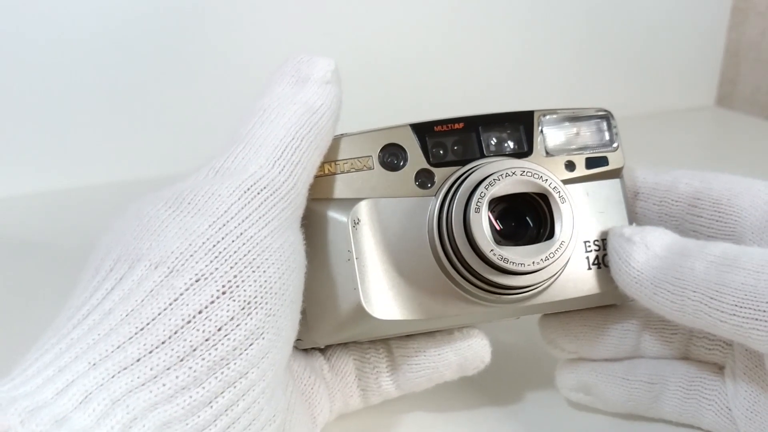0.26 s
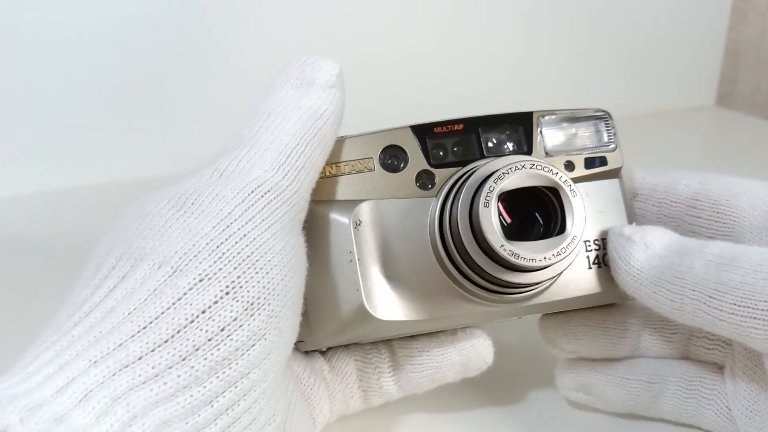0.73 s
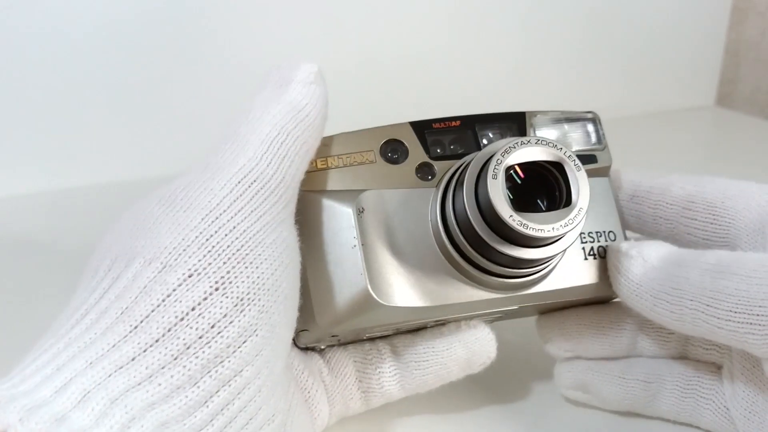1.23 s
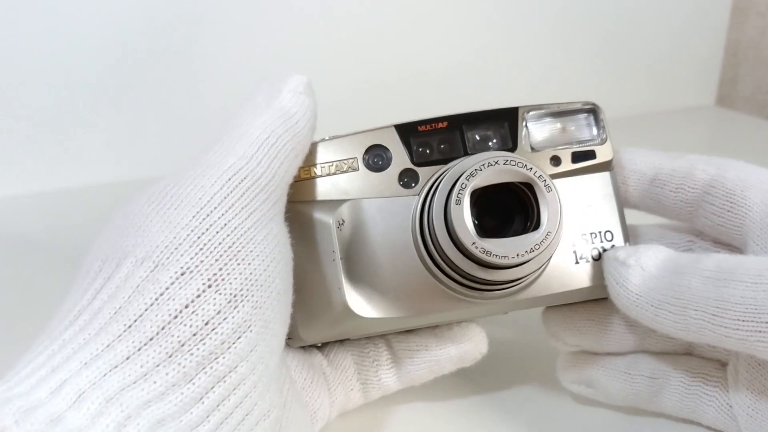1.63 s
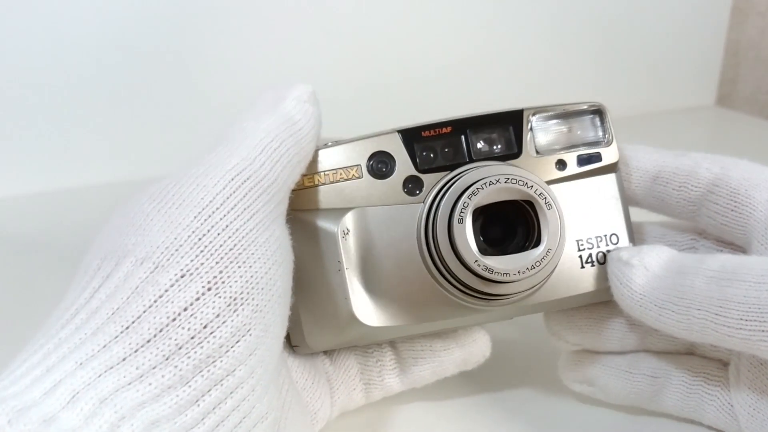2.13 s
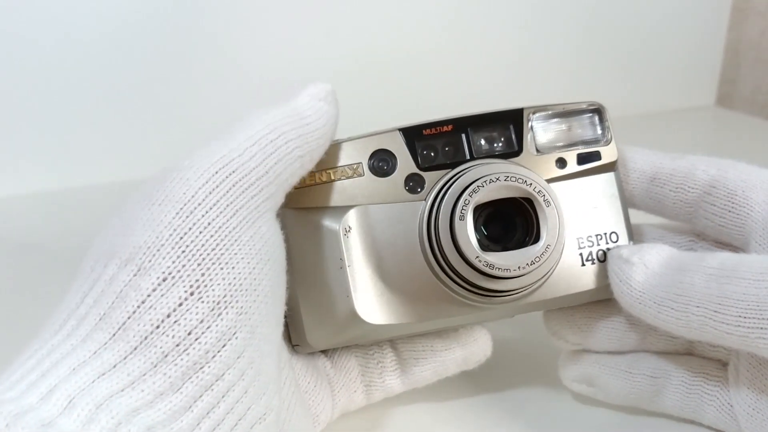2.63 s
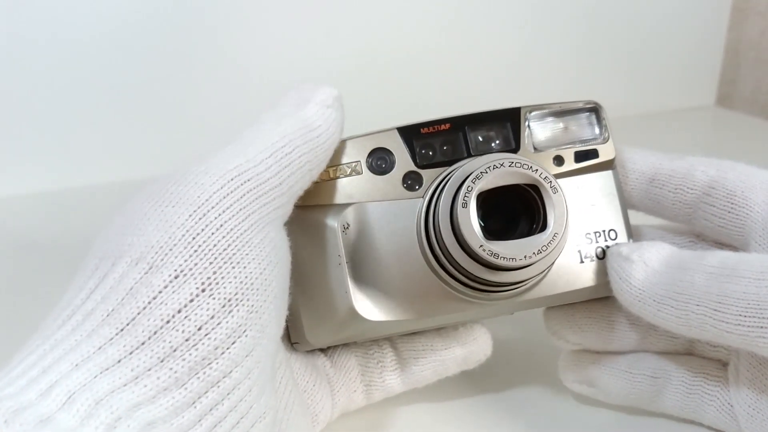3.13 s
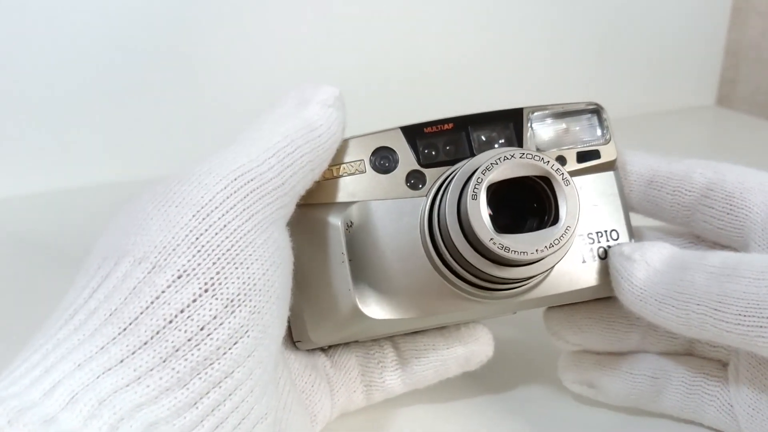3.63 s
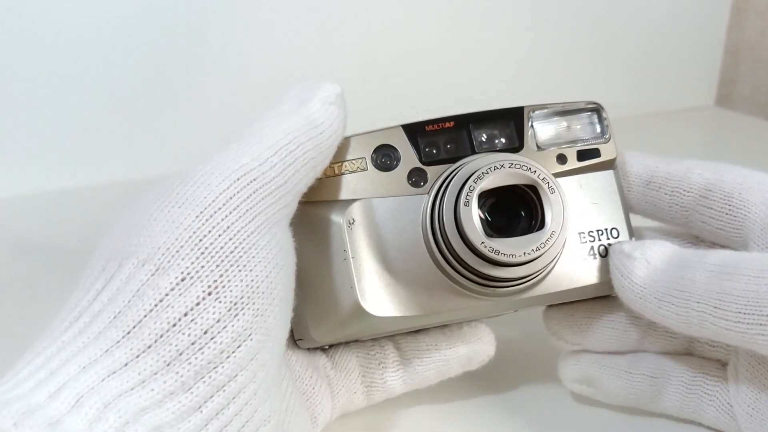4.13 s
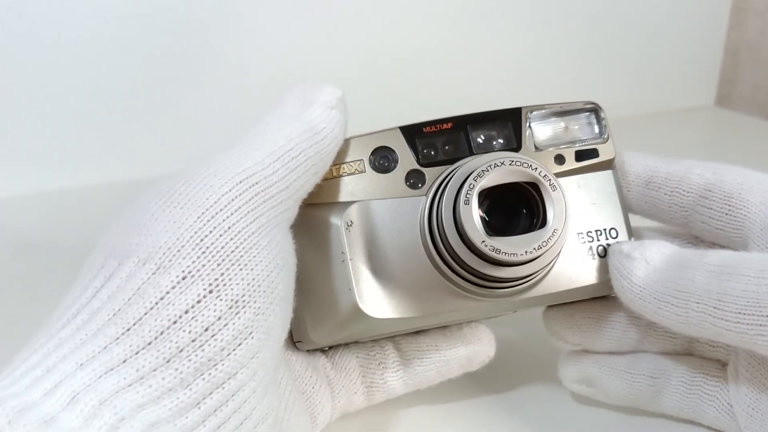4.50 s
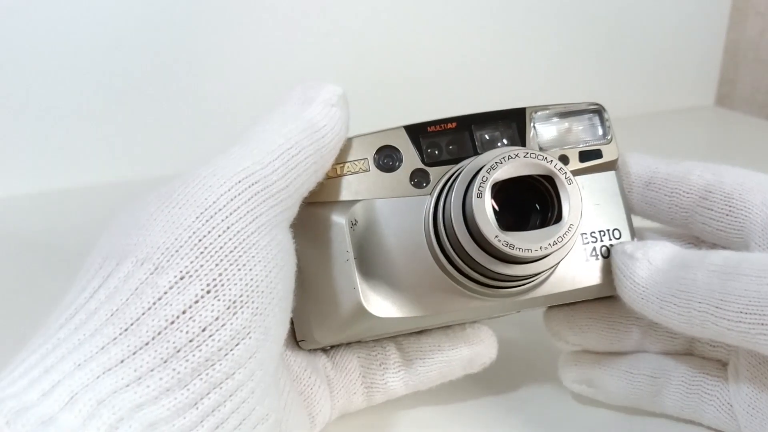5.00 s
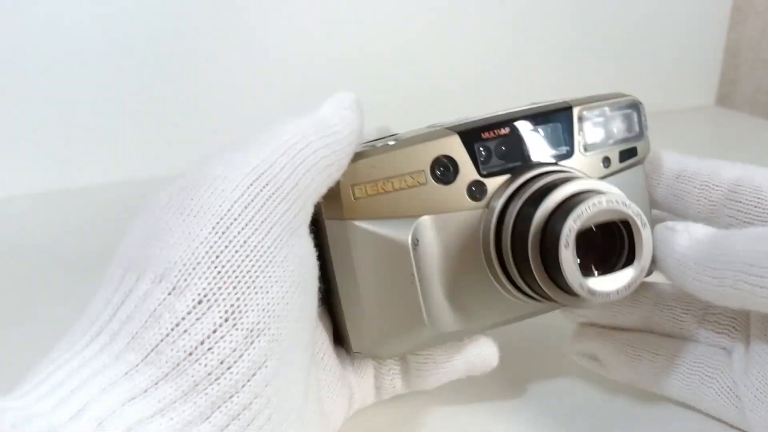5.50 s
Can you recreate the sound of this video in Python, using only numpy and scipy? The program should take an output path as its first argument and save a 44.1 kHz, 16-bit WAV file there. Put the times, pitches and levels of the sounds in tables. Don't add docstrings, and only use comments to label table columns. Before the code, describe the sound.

A compact camera close to a mono microphone in a small quiet room. A button clicks, then a short buzzy zoom run, while a vehicle drones past outside. Later come brighter whirring runs, each ended by a dry rattle, followed by tiny slack take-up chirps and slower, duller runs. Button ticks, soft low thumps and street rumble fill the gaps, with faint hiss rising after each bright sound.

```python
import sys
import numpy as np
from scipy import signal
from scipy.fft import rfft, irfft
from scipy.io import wavfile
from scipy.ndimage import uniform_filter1d

SR = 44100
rng = np.random.default_rng(int(sys.argv[2]) if len(sys.argv) > 2 else 0)


def waveform_to_disk(signal):
    frames = np.transpose(np.atleast_2d(signal))
    scaled = np.clip(frames, -1, 1) * 32767
    samples = np.round(scaled).astype(np.int16)
    wavfile.write(sys.argv[1], SR, samples)


def nominal_scale(level):
    x = np.asarray(level, float) / 20
    return 10 ** x


N = 253771


def evened(x):
    return x / np.sqrt(np.mean(x ** 2) + 1e-20)


def read(points, hz):
    f, value = np.transpose(points)
    return np.interp(np.log(hz + 1), np.log(f + 1), value)


def curve(rows, t):
    s, *columns = np.transpose(rows)
    return [np.interp(t, s, c) for c in columns]


def add(mix, s, sound):
    part = mix[round(s * SR):][:len(sound)]
    part += sound[:len(part)]


def drift(n, rate_hz):
    knots = rng.standard_normal(int(n / SR * rate_hz) + 2)
    return np.interp(np.arange(n) / SR * rate_hz, np.arange(len(knots)), knots)


def coloured(x, db_of):
    gain = np.log(nominal_scale(np.maximum(db_of(abs(np.fft.fftfreq(8192, 1 / SR))), -100)))
    taps = np.fft.ifft(np.exp(gain - 1j * signal.hilbert(gain).imag)).real[:4096]
    return signal.oaconvolve(x, taps / np.linalg.norm(taps))[:len(x)]


def noise(points, patchy_db):
    frames, hz = N // 512 + 5, np.fft.rfftfreq(2048, 1 / SR)
    a, b, patches = rng.standard_normal((frames, 1025, 3)).T
    patches = uniform_filter1d(patches, size=14, axis=0)
    patches = evened(uniform_filter1d(patches, size=6, axis=1))
    outside = (hz < points[0][0]) | (hz > points[-1][0])
    level_db = (read(points, hz) - 60 * outside)[:, None] + patchy_db * patches
    z = (a + 1j * b) * nominal_scale(level_db)
    return evened(signal.istft(z, nperseg=2048, noverlap=1536)[1][:N])


# time in seconds, level in dB.
ROAD_LEVEL = [
    (0, -59),
    (.3, -59.5),
    (.55, -52.5),
    (1.6, -50.5),
    (2.7, -59),
    (4.46, -61),
    (4.95, -55.5),
    (5.6, -60),
    (5.75, -63),
]
# frequency in Hz, density in dB per Hz.
ROAD_COLOUR = [(71, -37), (120, -6), (177, -7), (345, -9.5), (400, -8.5), (438, -13.5), (600, -14.5),
               (807, -18), (1600, -23.5), (2890, -30.5), (4350, -42), (6660, -42.5), (10000, -51),
               (13000, -87), (22000, -120)]


def tyre_wash():
    road_db, = curve(ROAD_LEVEL, np.arange(N) / SR)
    return nominal_scale(road_db) * noise(ROAD_COLOUR, 1.78)


def room_mode(hz, width_hz):
    f = np.fft.rfftfreq(N, 1 / SR)
    resonance = 1 + (2 * (f - hz) / width_hz) ** 2
    return evened(irfft(rfft(rng.standard_normal(N)) / resonance, N))


# frequency in Hz, width in Hz, level in dB, share of the traffic swell.
ROOM_MODES = [(58.5, 34, -56.5, .1), (97, 36.5, -54.5, 0.65), (147.6, 84, -61, .6)]


def rumble():
    swell_db = curve(ROAD_LEVEL, np.arange(N) / SR)[0] + 57.5
    return sum(nominal_scale(db + share * swell_db) * room_mode(hz, width) for hz, width, db, share in ROOM_MODES)


def engine(rows, orders, waver_db):
    t = np.arange(N) / SR
    hz, db = curve(rows, t)
    fade_in, fade_out = (t - rows[0][0]) / 0.03, (rows[-1][0] - t) / 0.11
    edge = np.clip(np.minimum(fade_in, fade_out), 0, 1)
    turns = np.cumsum(hz) / SR
    total = 0
    for k, order_db in orders:
        level = np.sqrt(2) * nominal_scale(order_db + waver_db * drift(N, 8.76))
        total = total + level * np.sin(2 * np.pi * (k * turns + rng.random()))
    return edge * nominal_scale(db) * total


# time in seconds, pitch in Hz, level in dB.
DRONE = [
    (0.0, 54.5, -40),
    (0.07, 54.4, -36),
    (0.226, 54.7, -32.5),
    (0.62, 58.5, -29.5),
    (0.81, 60.6, -33.5),
    (0.92, 62.3, -41),
    (1.006, 63.4, -33),
    (1.328, 63.6, -46.5),
    (1.4, 67.8, -56),
]
# time in seconds, pitch in Hz, level in dB.
BOOM = [
    (2.22, 74, -61),
    (2.33, 73, -43),
    (2.364, 74.03, -49),
    (2.404, 75.7, -37.5),
    (2.54, 74, -44),
    (2.562, 74.6, -58),
    (2.592, 74, -39),
    (2.64, 73, -61),
]
# time in seconds, turning rate in Hz, level in dB.
FIRING = [
    (1.2, 33.25, -73),
    (1.5, 34.11, -56.5),
    (1.75, 35.19, -58.5),
    (2.0, 35.83, -57.5),
    (2.3, 37, -73),
]
# multiple of the turning rate, level in dB.
FIRING_ORDERS = [(3, -2.5), (4, 3), (5, 3.5), (7, -4.5), (9, -6.5), (10, -20), (12, -9.5)]


def street():
    engines = engine(DRONE, [(0.99, 0)], 0.92)
    engines += engine(FIRING, FIRING_ORDERS, 1.5)
    engines += engine(BOOM, [(0.98, 0)], 0.3)
    return engines + rumble() + thumps() + tyre_wash()


# frequency in Hz, width in Hz, level in dB.
SHELL_PEAKS = [(813, 45, 1.5), (1293, 70, -1.5), (1568, 52, -7), (2060, 24, -29.5), (3075, 91, 0.5),
               (3368, 79, -3), (3960, 210, -10.5), (4290, 23, -8), (4810, 31, -10.5), (5703, 50, -9),
               (6708, 116, -10.5), (8550, 240, -23)]
# frequency in Hz, level in dB.
SHELL_BED = [(250, -85), (600, -18), (2000, -11.5), (5000, -19), (9000, -29.5), (11500, -42), (14000, -48),
             (16000, -43)]


def shell_db(hz):
    peaks = sum(nominal_scale(db) ** 2 / (1 + (2 * (hz - f) / w) ** 2) for f, w, db in SHELL_PEAKS)
    return 10 * np.log10(peaks + nominal_scale(read(SHELL_BED, hz)) ** 2)


def tick(db, hz, ring_s):
    t = np.arange(2600) / SR
    puff = rng.standard_normal(len(t)) * np.exp(-t / ring_s) * (1 - np.exp(-t * hz / 0.97))

    def colour_db(f):
        octaves = np.log2((f + 50) / hz)
        return 0.44 * shell_db(f) - 3.4 * octaves ** 2 - 14 * np.maximum(octaves - 0.7, 0)

    ring = coloured(puff, colour_db)
    return nominal_scale(db) * ring / abs(ring).max()


# start in seconds, peak in dB, brightness in Hz, ring in seconds.
TICKS = [(.032, -53.5, 900, 0.004), (.046, -59.5, 2580, 0.0062), (.305, -47, 1350, 0.0054),
         (.3125, -41.5, 1350, 0.0055), (0.3153, -30, 4530, 0.0043), (0.3167, -38, 4460, 0.0067),
         (0.424, -57, 2500, .003), (.489, -48, 1500, 0.0043), (1.114, -59, 2500, 0.0038),
         (1.599, -52, 9060, 0.0059), (1.791, -58, 2510, .003), (4.162, -31, 8950, 0.0034),
         (2.454, -34.5, 2500, 0.007), (4.232, -38, 3000, 0.0045), (5.321, -38.5, 2480, .005),
         (3.548, -61, 1500, 0.003), (3.592, -73, 2920, 0.0033), (3.658, -63, 9060, 0.0036),
         (3.68, -65, 7000, .003), (4.418, -49, 7000, 0.0049), (4.4172, -46, 1390, 0.0075),
         (5.012, -62, 8100, 0.0029), (5.636, -68, 1490, 0.0027)]


def ticks():
    out = np.zeros(N)
    for s, *shape in TICKS:
        add(out, s, tick(*shape))
    return out


def shaft_tones(orders, top, hz, turns, speed, uneven, unloaded, sings, whine_db, glide_db, high_db):
    n = len(hz)
    grid = np.arange(0, 20000, 10.)
    shell = shell_db(grid)
    high_hz = top * np.arange(len(orders) + 1, 40)
    levels = np.append(orders, high_db + 6 * np.exp(-((high_hz - 13900) / 450) ** 2))
    whine = glide = 0
    for k, db in enumerate(levels, 1):
        here = np.interp(k * hz, grid, shell)
        crossing = 0.94 * (here - np.interp(k * top, grid, shell))
        waver = (0.1 + 0.19 * min(k, 9)) * drift(n, 20 + 4 * k)
        waver -= 3.6 * np.maximum(1 - hz / top, 0) * max(k - 8, 0)
        blur = (0.0034 + 0.0053 * max(k - 5, 0) + 0.017 * max(k - 18, 0)) * drift(n, 158.5)
        phase = k * (turns + uneven) + blur + 0.73 * rng.random()
        tone = np.cos(2 * np.pi * phase)
        whine = whine + nominal_scale(db + np.clip(crossing, -14, 12) + waver) * tone
        loose_db = 3 * (k == 4) + 0.79 * here + waver
        loose_db = loose_db + 5.7 * drift(n, 89.7) - 0.9 * np.log2(k * hz / 1600 + 0.0072) ** 2
        glide = glide + nominal_scale(loose_db) * tone
    whine *= np.sqrt(2 / sum(nominal_scale(levels) ** 2)) * nominal_scale(whine_db) * speed ** sings
    return whine, 2 * nominal_scale(glide_db) * unloaded * speed * glide


# frequency in Hz, level in dB.
BRUSH = [(250, -18), (600, -8.5), (1500, -9.5), (3200, -2), (5000, -0.5), (7000, -4), (9000, -1),
         (11500, -6), (14000, -6), (15800, -13)]


def brush_hiss(turns, speed, hiss_db):
    gate = (0.31 + np.exp(-(turns % 1) / 0.24)) * nominal_scale(1.3 * drift(len(turns), 18.2))
    scrape = evened(gate * rng.standard_normal(len(turns)))
    hiss = coloured(scrape, lambda f: read(BRUSH, f) + 0.5 * shell_db(f))
    return hiss * nominal_scale(hiss_db) * speed ** 3.5


def gear_rattle(turns, speed, uneven, after, unloaded, top, rattle_db, brake_db):
    n = len(turns)
    loose = nominal_scale(rattle_db - 1.5) * unloaded
    brake_s = 0.11 * (top / 1000) ** 1.61
    loose += nominal_scale(brake_db) * np.minimum(after / 0.0037, 1) * np.exp(-(after / brake_s) ** 3.1)
    loose += nominal_scale(brake_db - 14) * (after > 0) * np.exp(-after / 0.026)
    knocks = np.diff(np.floor(turns + 0.32 * uneven), prepend=0) * nominal_scale(0.6 * drift(n, 301.0))
    knocks = knocks * (after == 0) * speed ** 1.2
    clatter = rng.standard_normal(110) * np.hanning(110)
    knocks = np.convolve(knocks, clatter)[:n]
    grit = (rng.random(n) < 14000 / SR) * rng.standard_normal(n) * nominal_scale(1.0 * drift(n, 250.))
    rattle = (1.28 * evened(knocks) + 0.6 * evened(grit)) * loose
    return coloured(rattle, lambda f: 0.9 * shell_db(f) + 2.8 * np.exp(-((f - 1550) / 420) ** 2))


def motor(orders, run, spin_up, sluggish, early, rattle_db, swell, sings, glide_db, hiss_db, gear, gear_db,
          high_db):
    start, brake, top, whine_db, brake_db = run
    t = np.arange(round((brake - start + 0.06) * SR)) / SR
    after = np.maximum(t - (brake - start), 0)
    sway = 1 + 0.0029 * np.sin(2 * np.pi * (9.12 * t + rng.random()))
    goal = top * sway + early * np.exp(-t / 0.075)
    speed = (1 - np.exp(-t / spin_up)) ** sluggish * np.exp(-after / 0.019)
    hz = goal * speed * (1 + 0.00096 * drift(len(t), 59.4))
    turns = np.cumsum(hz) / SR
    uneven = drift(len(t), 500.) * 0.056 * (1 - speed) ** 0.7
    unloaded = np.minimum(t / swell, 1) ** 0.63 * np.exp(-(t / 0.064) ** 3)
    whine, glide = shaft_tones(orders, top, hz, turns, speed, uneven, unloaded, sings, whine_db, glide_db,
                               high_db)
    lens_level = np.sqrt(2) * nominal_scale(gear_db + 3.4 * drift(len(t), 18.0)) * speed ** 8
    lens_gear = lens_level * np.cos(2 * np.pi * gear * turns)
    rattle = gear_rattle(turns, speed, uneven, after, unloaded, top, rattle_db, brake_db)
    return whine + glide + lens_gear + brush_hiss(turns, speed, hiss_db) + rattle


# start in seconds, brake in seconds, settled speed in turns per s,
# whine in dB, brake rattle in dB.
FIRST_RUN = [
    (0.59, 0.885, 394.5, -42.5, -36),
]
OUT_RUNS = [
    (2.006, 2.387, 430.3, -33.5, -34.5),
    (3.71, 4.167, 429.8, -34, -34),
    (5.046, 5.261, 432.5, -34.5, -35),
]
SLACK_RUNS = [
    (2.451, 2.577, 392.4, -40, -35),
    (4.229, 4.358, 393, -41, -34.5),
    (5.32, 5.448, 390.2, -40.5, -34.5),
]
BACK_RUNS = [
    (2.894, 3.384, 395.4, -42, -35.5),
    (4.518, 4.792, 397, -42.5, -36.5),
]
# level in dB of shaft orders 1, 2, 3 .. as the camera is held in that kind of run.
FIRST_ORDERS = [0.5, -0.5, -14.5, -18, -0.5, -4.5, -15, -4, -10, -2.5, -15, -14, -18, -16, -14, -17, -1.5,
                -10, -27, -17, -18, -17, -22, -19]
OUT_ORDERS = [-13, -15, 2.5, -14.5, -15, -16.5, -19, -10.5, -16.5, -16.5, -19.5, -22, -19, -22.5, -28, -23,
              -24.5, -34, -38, -32, -32, -31.5, -35, -33]
SLACK_ORDERS = [1.5, 0.5, -10, -14, 5, -10, -6.5, -3, -7, -3.5, -12, -16, -18, -22, -34, -36, -3.5, -10,
                -15, -14, -14, -24, -23, -14]
BACK_ORDERS = [-1, 0, -12.5, -12.5, 1, -5, -11.5, -8, -7, -11, -13.5, -10, -21, -12, -15, -32, -1.5, -13.5,
               -17, -23, -21, -14, -21, -20.5]
OUT_BITE = dict(spin_up=.023, sluggish=.92, early=-9, rattle_db=-37.5, swell=0.0097, sings=2.74, glide_db=-53.5, hiss_db=-55.5, gear=7.3, gear_db=-84, high_db=-39)
SLACK_BITE = dict(spin_up=.022, sluggish=1.05, early=24, rattle_db=-40.5, swell=.013, sings=15.3, glide_db=-47.5, hiss_db=-52.5, gear=10.3, gear_db=-64, high_db=-28)
BACK_BITE = dict(spin_up=.024, sluggish=1.3, early=-11, rattle_db=-38, swell=0.062, sings=6.6, glide_db=-46, hiss_db=-53, gear=10.27, gear_db=-56.5, high_db=-31)


def zoom_runs():
    out = np.zeros(N)
    for orders, runs, bite in ((FIRST_ORDERS, FIRST_RUN, BACK_BITE), (OUT_ORDERS, OUT_RUNS, OUT_BITE),
                               (SLACK_ORDERS, SLACK_RUNS, SLACK_BITE), (BACK_ORDERS, BACK_RUNS, BACK_BITE)):
        for run in runs:
            add(out, run[0], motor(orders, run, **bite))
    return out


# middle in seconds, peak in dB, length in seconds, pitch in Hz.
THUMPS = [(1.628, -50, .07, 58), (1.806, -50, 0.042, 62), (1.97, -40, 0.024, 57.5),
          (2.089, -41.5, 0.044, 57.3), (2.078, -40.5, 0.017, 104), (2.428, -42.5, 0.071, 58.7),
          (2.69, -44, 0.043, 97), (2.892, -45.5, 0.021, 110), (2.961, -51, 0.046, 55),
          (3.13, -44, 0.044, 55.4), (3.322, -43.5, 0.072, 56), (3.492, -45, 0.064, 55.4),
          (3.697, -50.5, 0.087, 58.3), (4.128, -48.5, .07, 59.6), (4.295, -46, 0.097, 56),
          (4.548, -54, 0.037, 56.6), (4.851, -47.5, .07, 59), (4.897, -55, 0.057, 101),
          (5.049, -55, 0.041, 95), (5.115, -47, .06, 56), (5.387, -47, 0.043, 58),
          (5.562, -49, 0.032, 56.7), (5.72, -48.5, 0.024, 98)]


def thumps():
    t = np.arange(N) / SR
    total = np.zeros(N)
    for s, db, length, hz in THUMPS:
        swell = np.sqrt(2) * nominal_scale(db) * np.exp(-((t - s) / length) ** 2)
        total += swell * np.sin(2 * np.pi * (hz * (t - s) + rng.random()))
    return total


# frequency in Hz, time to fall 60 dB in seconds.
ROOM_DECAY = [(300, 0.44), (1300, 0.33), (5000, 0.25), (12000, 0.13)]


def room(x):
    taps, at = np.zeros(SR // 2), np.arange(90, SR // 2 - 20, 20)
    taps[at + rng.integers(0, 20, len(at))] = rng.choice([-1., 1.], len(at))
    hz, t, z = signal.stft(taps, SR, nperseg=256)
    decay = nominal_scale(-60 * t / read(ROOM_DECAY, hz)[:, None])
    tail = signal.istft(z * decay, SR, nperseg=256)[1]
    return signal.fftconvolve(x, tail / np.linalg.norm(tail))[:N]


def scene():
    camera = zoom_runs() + ticks()
    mono = camera + nominal_scale(-18) * room(camera) + street()
    return np.array([mono, mono])


def gate_db(dry):
    t = np.arange(N) / SR
    open_db, shut_db, fall_db_s = 5.5, -4.5, 37
    bright = uniform_filter1d(np.diff(dry[0], prepend=0) ** 2, size=200) > nominal_scale(-55) ** 2
    since = t - np.maximum.accumulate(np.where(bright, t, -1))
    ajar_db = shut_db + 0.4 * (curve(ROAD_LEVEL, t)[0] + 60)
    return np.maximum(open_db - fall_db_s * since, ajar_db)


# frequency in Hz, density in dB per Hz.
PREAMP_HISS = [(2000, 2), (6000, -36), (10000, 5), (14000, 8), (16000, 1)]


def preamp_hiss(dry):
    return nominal_scale(-84 + gate_db(dry)) * noise(PREAMP_HISS, 2.2)


def low_pass(x):
    return signal.sosfilt(signal.butter(12, 16450, fs=SR, output="sos"), x)


def record(dry):
    x = dry + preamp_hiss(dry)
    x = signal.sosfilt(signal.butter(3, 40, "high", fs=SR, output="sos"), x)
    band_edge = signal.firwin(511, 15850, window=("kaiser", 9), fs=SR)
    x = signal.oaconvolve(x, band_edge[None], "same")
    return low_pass(x)


dry = scene()
out = record(dry)
waveform_to_disk(out)
```